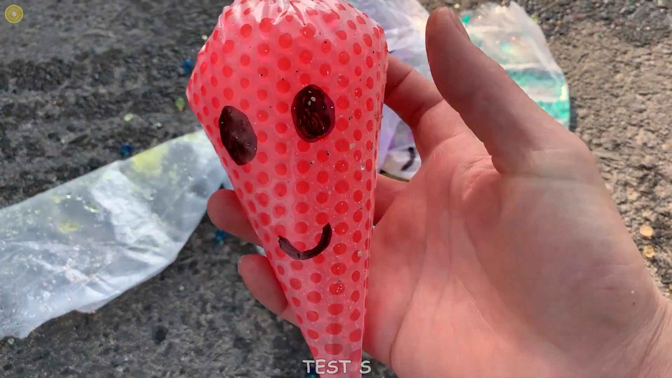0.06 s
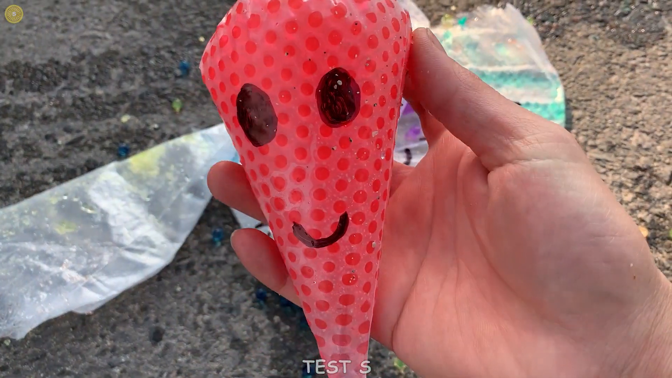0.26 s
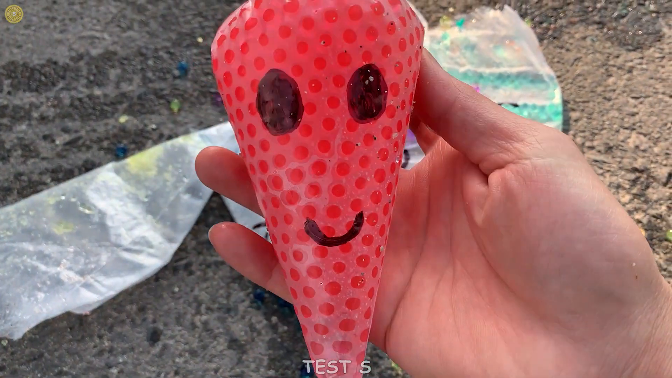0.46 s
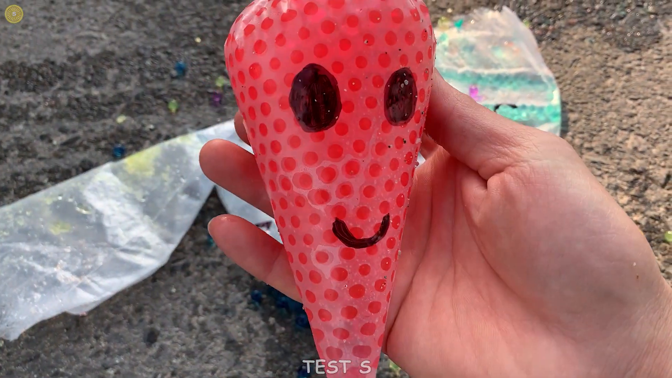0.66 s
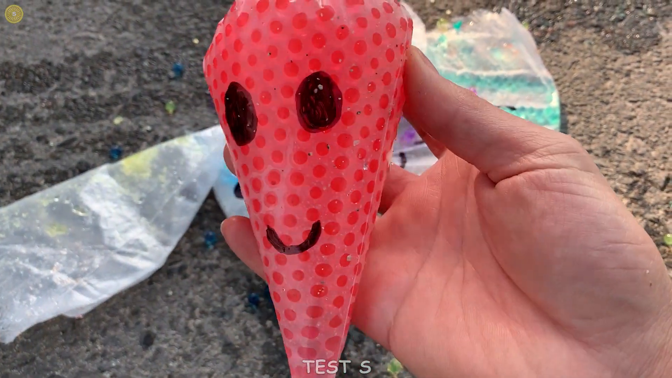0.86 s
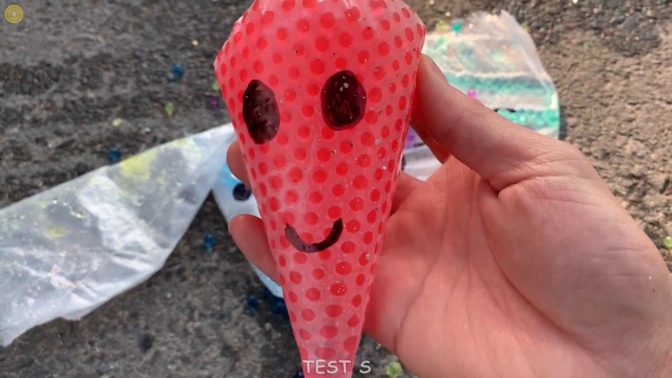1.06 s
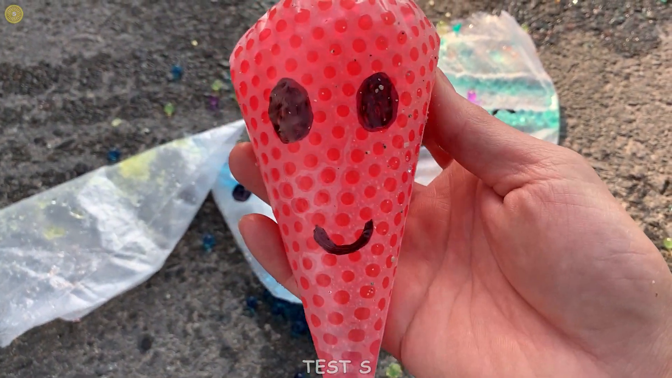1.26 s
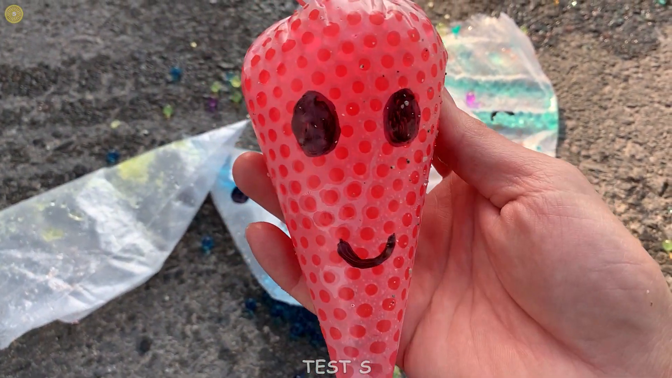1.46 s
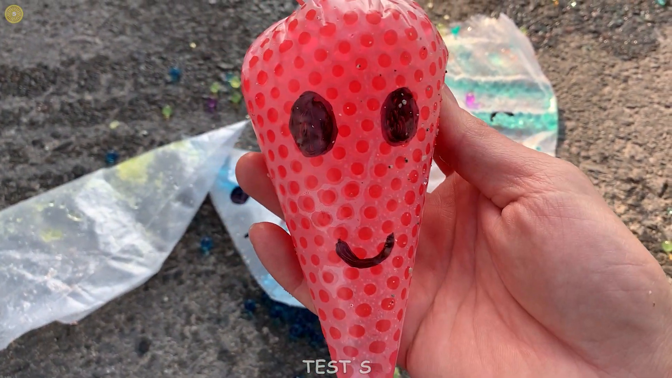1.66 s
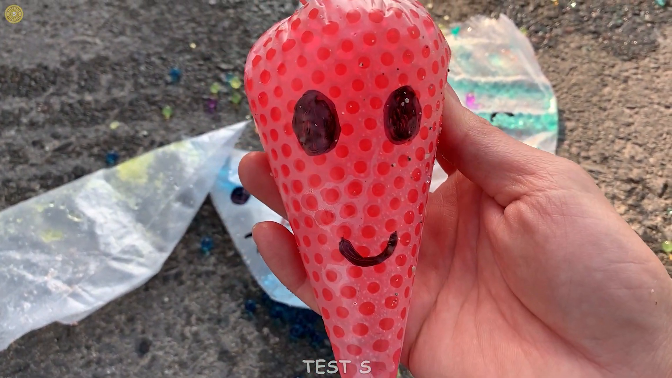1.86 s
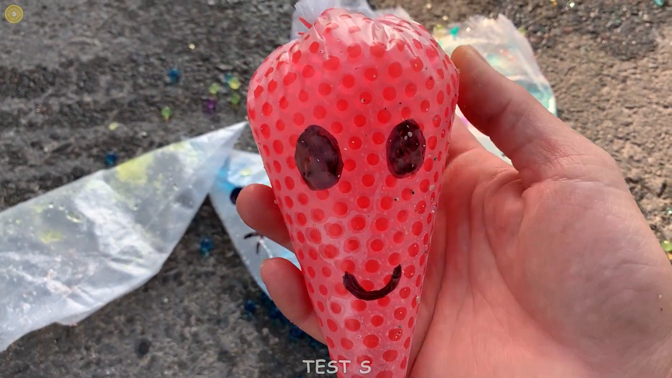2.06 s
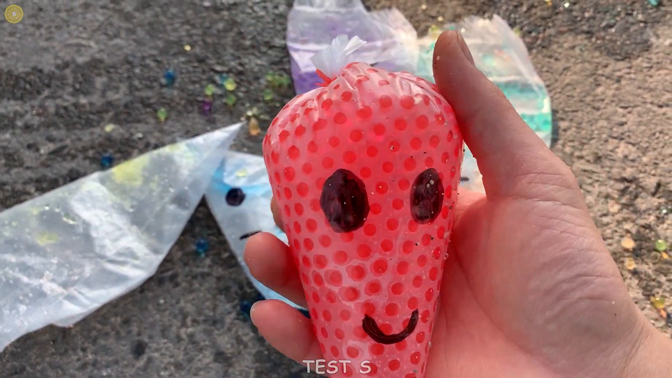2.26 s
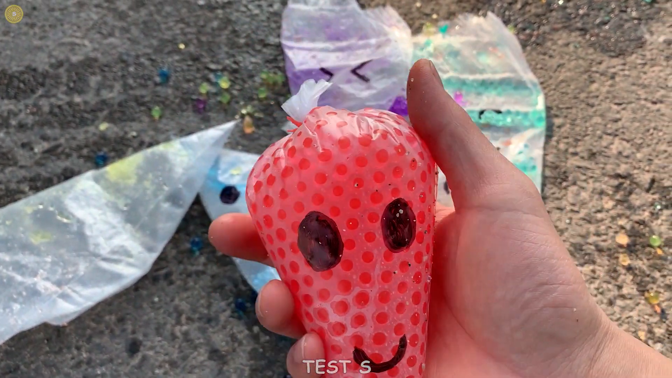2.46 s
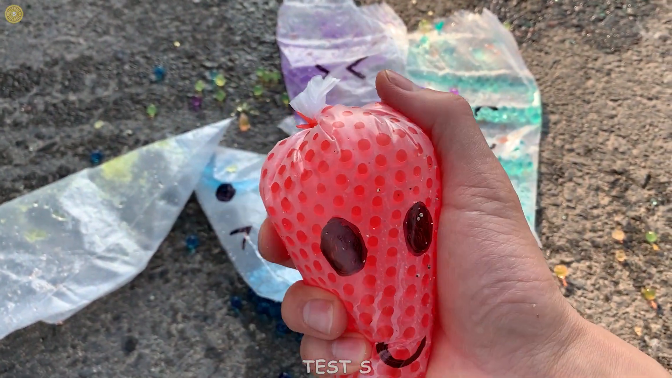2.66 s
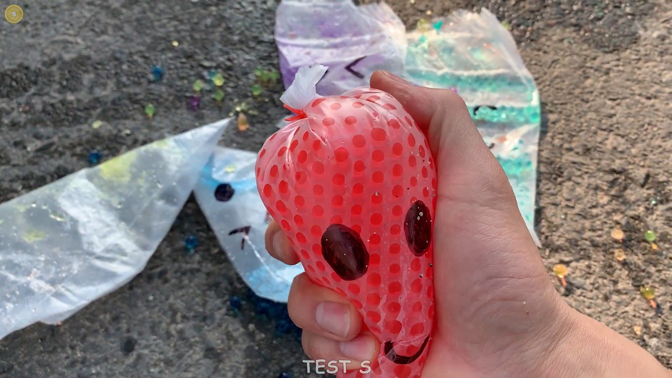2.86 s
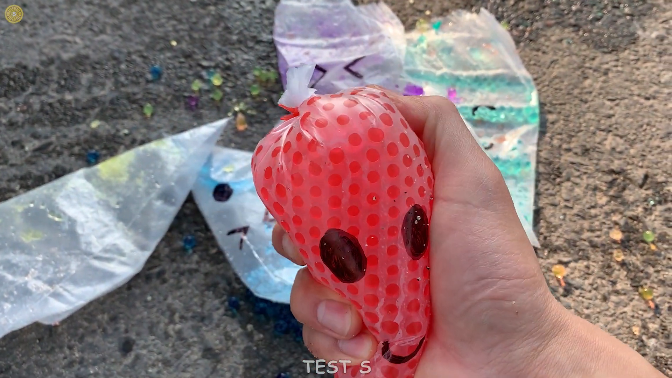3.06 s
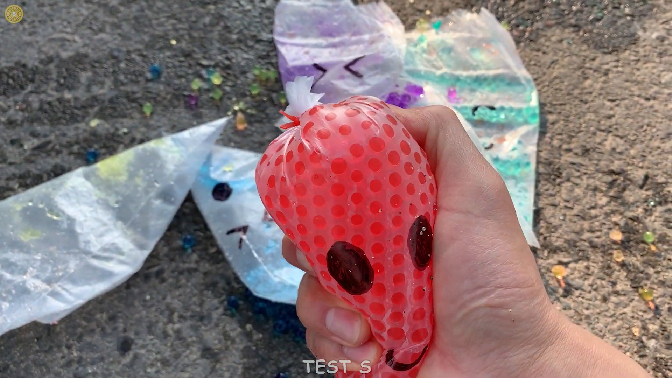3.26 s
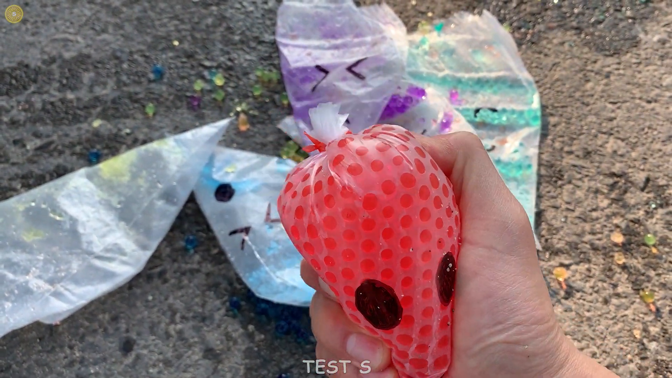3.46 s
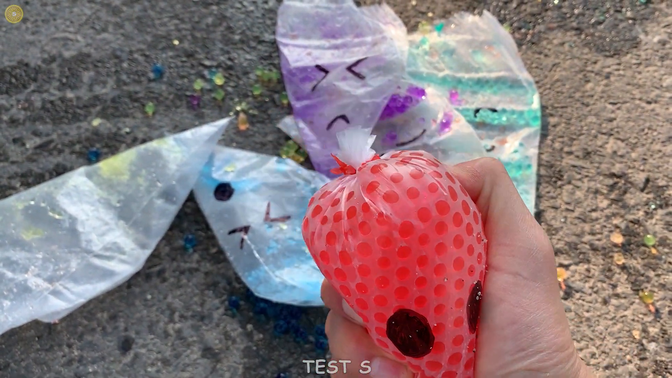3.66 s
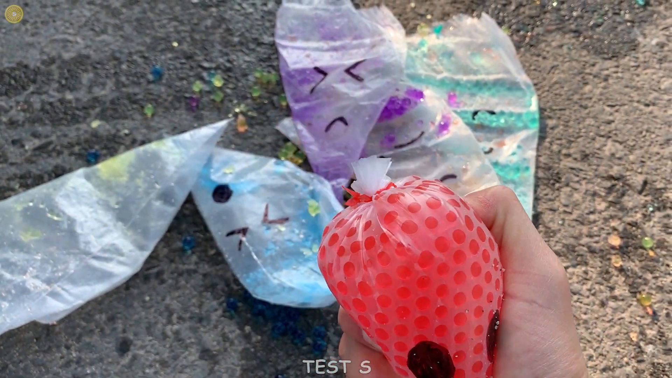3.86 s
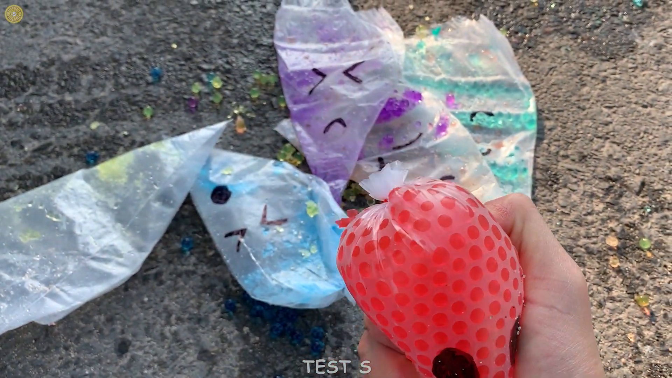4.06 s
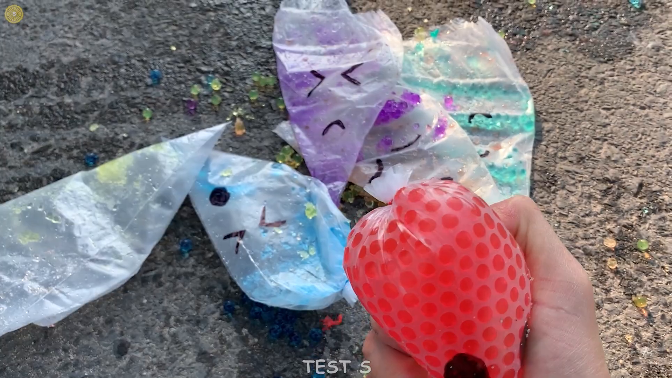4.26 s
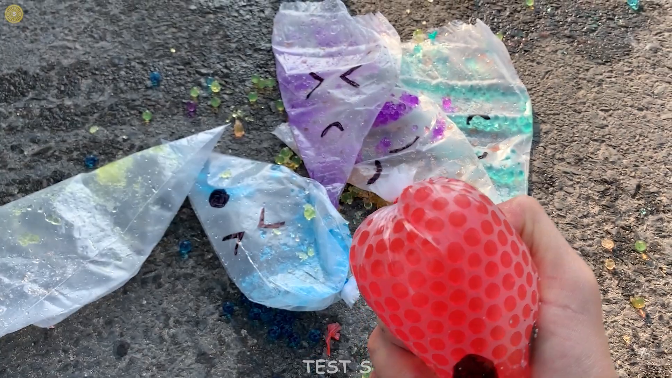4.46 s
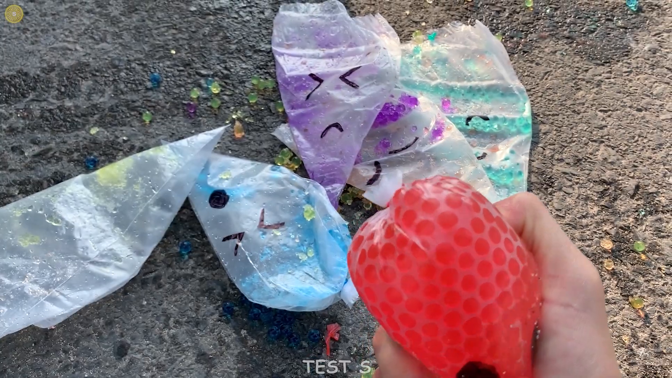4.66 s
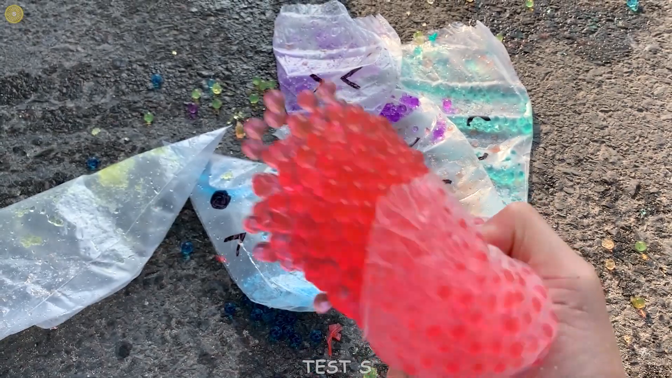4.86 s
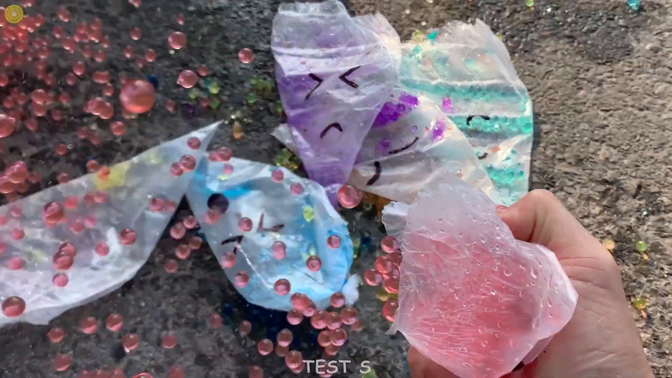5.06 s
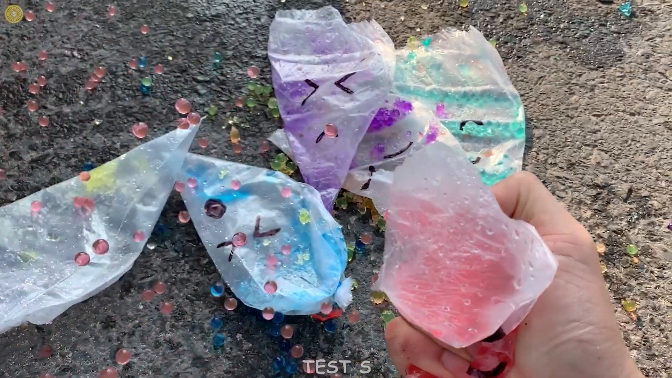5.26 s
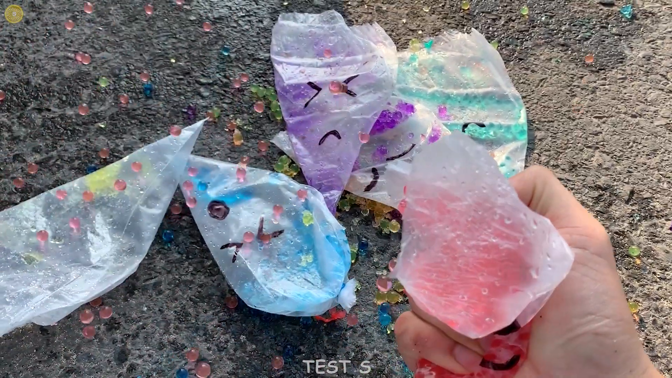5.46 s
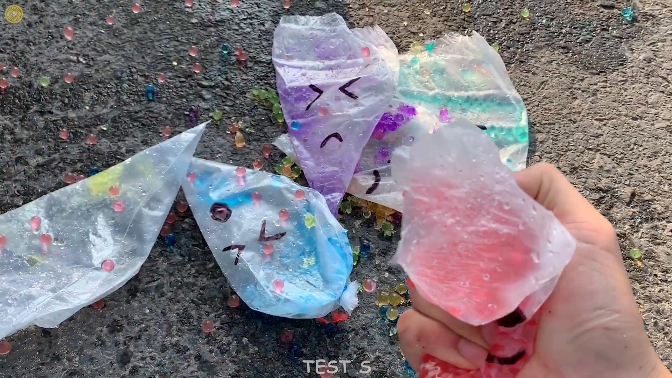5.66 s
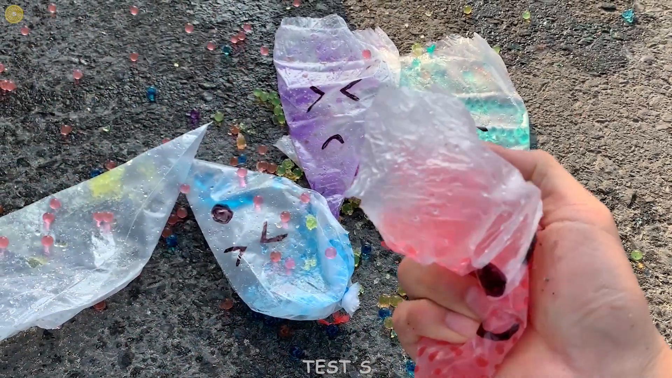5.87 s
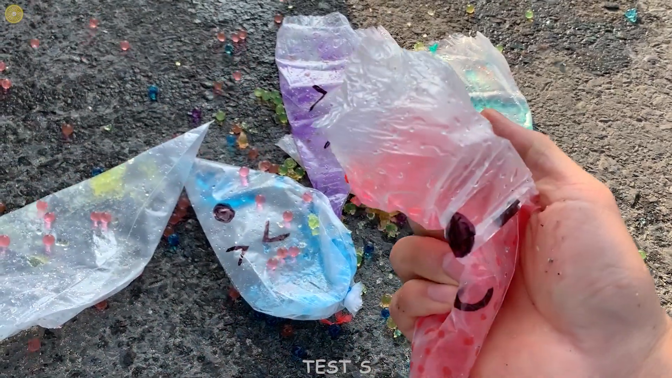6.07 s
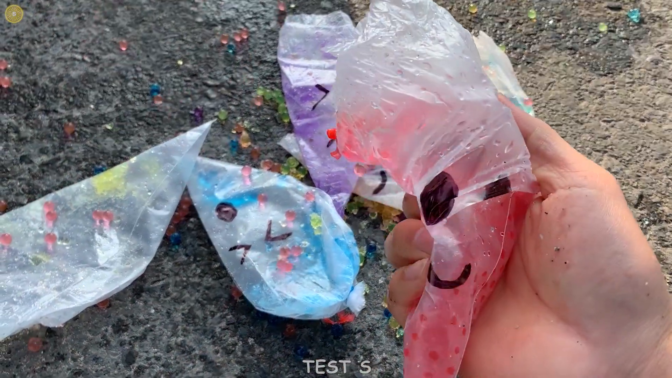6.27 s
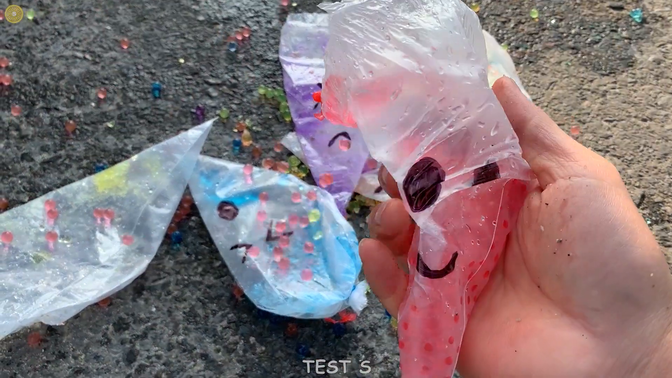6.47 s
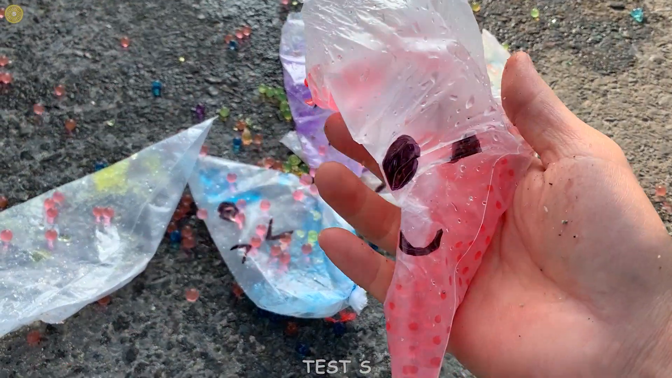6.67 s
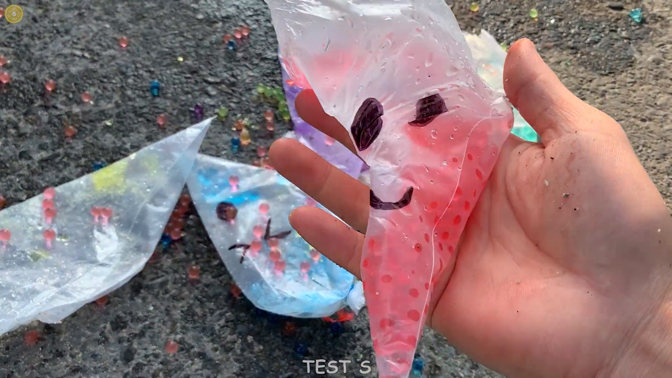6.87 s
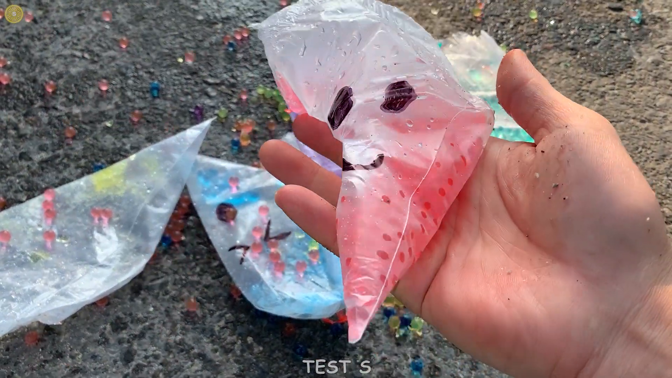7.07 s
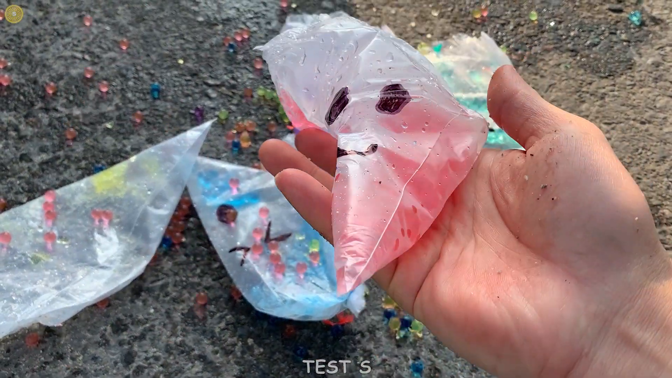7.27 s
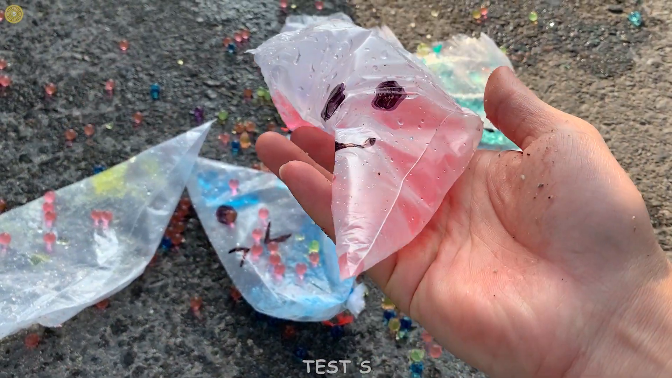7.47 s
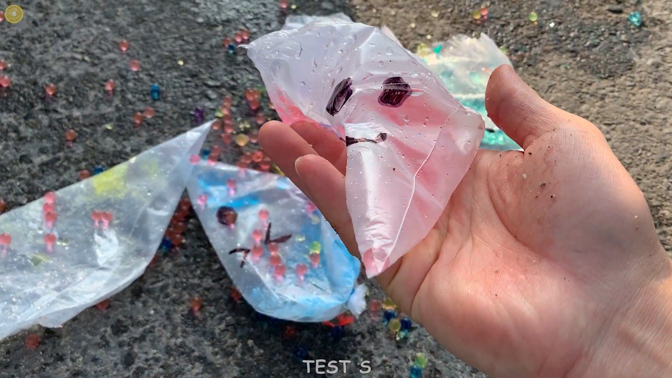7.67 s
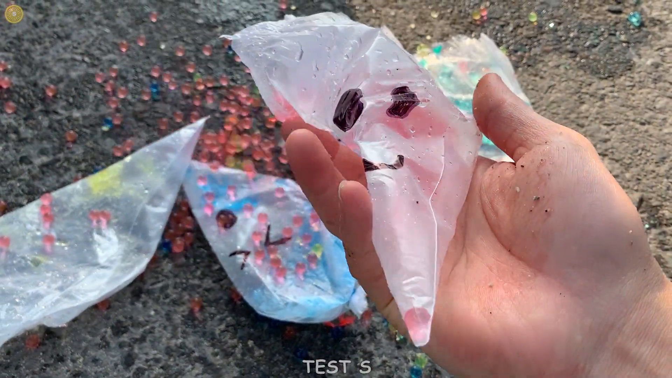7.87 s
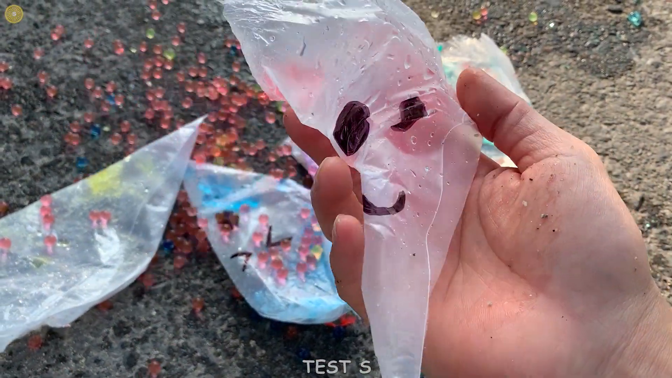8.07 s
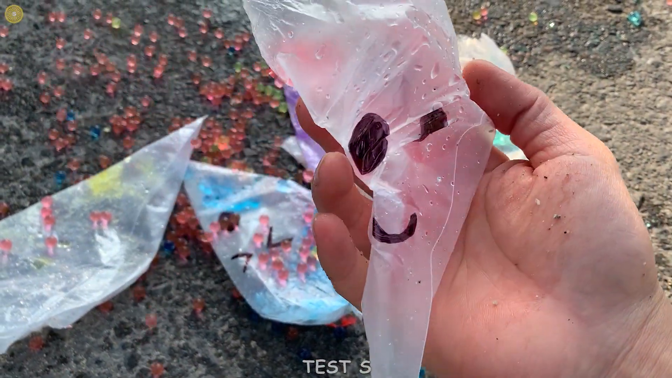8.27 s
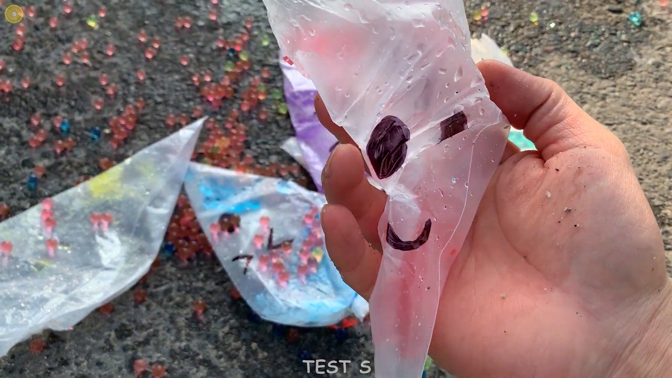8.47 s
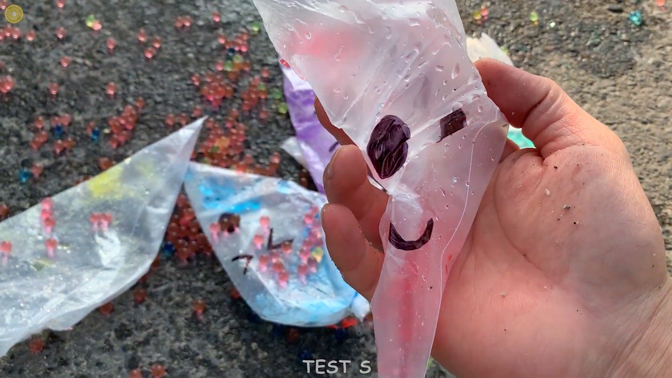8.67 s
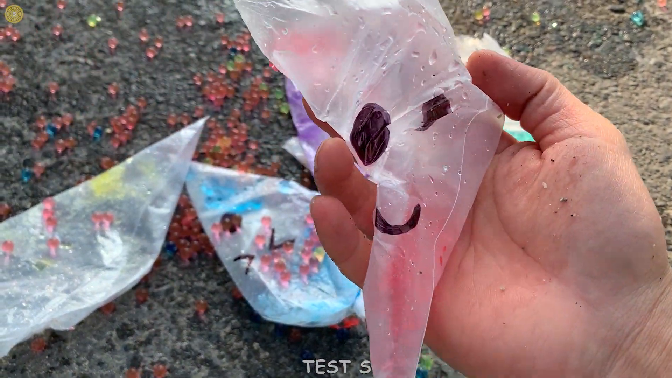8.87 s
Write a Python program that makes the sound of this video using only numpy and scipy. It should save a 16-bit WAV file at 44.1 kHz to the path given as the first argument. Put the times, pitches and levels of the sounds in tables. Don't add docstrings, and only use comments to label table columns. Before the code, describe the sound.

A car idles outdoors throughout, a low throbbing exhaust and motor hum with airy engine noise, plus a soft gust of wind near 0.7 seconds. Close to a phone, a full plastic pouch of gel beads gives a few tiny ticks in the first two seconds. From 2.0 to 3.4 the squeezing brings crisp snaps and small rustles. After a short lull, tighter creaks and sharp snaps come at 3.7 to 4.1, then a thin, high slipping rustle until about 4.5. At 4.9 the film splits with a loud ripping burst, a dull puff and a low flap. Beads patter over asphalt in quick waves until 5.3, amid springy crackles. The torn bag crinkles from 6.0, with a crunchy shake at 6.5. Around 7.5 to 8.1 beads spill in hollow rattles, then a few dull knocks and a last faint rustle near 8.9 over the idle.

```python
import sys
import numpy as np
from scipy import signal
from scipy.fft import rfft, irfft, next_fast_len
from scipy.io import wavfile

SR = 44100
rng = np.random.default_rng(int(sys.argv[2]) if len(sys.argv) > 2 else 0)


def rack_gain(trim_db):
    fader = np.asarray(trim_db, float)
    return 10 ** (fader / 20)


def generate_wav(sig):
    pcm = np.round(np.clip(np.atleast_2d(sig).T, -1, 1) * 32767).astype(np.int16)
    wavfile.write(sys.argv[1], SR, pcm)


N = 393813
PADDED = next_fast_len(N + 4096)
HZ = np.maximum(np.fft.rfftfreq(PADDED, 1 / SR), 1)

GUST_S, GUST_WIDTH_S, GUST_DB, BREEZE_DB = 0.71, 0.33, -44, -53

FIRINGS_PER_S = 23.25
# multiple_of_firing_rate, level_db
EXHAUST_TONES = [(1, -41.5), (2, -40), (3, -44), (4, -59), (5, -60.5), (7, -56.5), (8, -52.5), (9, -62.5)]
# pitch_hz, level_db
MOTOR_TONES = [(57.15, -45), (257.1, -51.5), (314.3, -60.5), (457.2, -56), (514.3, -62), (628.5, -66.5),
               (1350, -59)]
# frequency_hz, level_db (per Hz)
BAY_COLOUR = [(15, -19.5), (32, -23), (45, -10), (64, -4), (270, -18), (451, -22), (734, -31.5),
              (1330, -31), (3520, -37.5), (5880, -50), (7600, -40), (9200, -51), (11600, -67),
              (13200, -57.5), (15500, -99)]
# pitch_hz, width_hz, boost_db
BAY_RINGS = [(590, 38, -1.5), (1340, 20, 9.5), (1717, 115, 5), (2300, 360, -5.5), (2680, 130, 0.5),
             (4400, 990, 8)]
BAY_DB = -40
# frequency_hz, lead_radians
CAR_PHASE = [(0, 0), (1810, 4.9), (2500, 6.3), (3190, 8.7), (4650, 11.7), (5450, 13.6), (5800, 17.8),
             (7300, 21.9), (9400, 18.85), (11650, 15.7), (14100, 12.6), (16500, 9.5)]
# frequency_hz, difference_db
CAR_BALANCE = [(60, -1), (110, 0.5), (200, -4), (380, -1.5), (700, 3.5), (1290, 3.5), (2380, 1),
               (4400, -2.5), (8120, -0.5), (15000, 1)]

# frequency_hz, lead_radians
BAG_PHASE = [(0, 0), (520, 1.2), (1380, 1.0), (2580, 1.3), (3300, 1.4), (4220, 1.0), (5500, 1.5),
             (7100, 3.1), (9400, 0), (11650, -3.14), (14100, -6.3), (16500, -9.4)]
# frequency_hz, level_db (per Hz)
RUSTLE_COLOUR = [(2000, -25), (5000, -34), (6800, -17.5), (7500, -9.5), (8800, -8.5), (10600, -12),
                 (12000, -18.5), (14000, -19.5), (15300, -24.5), (16400, -54)]
# frequency_hz, level_db (per Hz)
PATTER_COLOUR = [(59, -35), (100, -36), (645, 8.5), (793, -4), (1270, 7), (1720, 2), (2070, 7.5), (2910, 8),
                 (4010, 9), (7050, 4), (9000, 3), (11700, -42), (19800, -120)]
# frequency_hz, level_db (per Hz)
SNAP_COLOUR = [(700, -7.5), (2500, -23.5), (4300, -11), (6500, 1), (8000, 6), (11000, -0.5), (13500, -5),
               (15800, -18.5), (16700, -104)]
BEAD_HZ = np.geomspace(700, 6500, 9)

# start_s, hold_s, rustle_db, patter_db, grains_per_s
SLOW_GESTURES = [(2.087, 0.088, -50.5, -61.5, 1600), (2.463, 0.26, -58, -65, 500),
                 (2.927, 0.12, -63.5, -67, 410), (3.22, 0.067, -64, -70, 340), (3.98, 0.1, -56, -69, 680),
                 (4.593, 0.32, -57, -84, 1000), (5.42, 0.035, -55, -51, 990),
                 (5.683, 0.36, -59.5, -59.5, 470), (5.976, 0.53, -61, -58, 450),
                 (6.662, 0.15, -58.5, -61, 340), (6.91, 0.66, -69.5, -64, 160),
                 (7.494, .05, -55.5, -56.5, 1300), (7.6, 0.057, -54, -48.5, 1800),
                 (7.735, 0.094, -48, -47, 1400), (7.927, 0.14, -54, -57, 600),
                 (8.292, 0.18, -87, -63.5, 120), (8.92, 0.057, -51, -58.5, 160)]
QUICK_GESTURES = [
    (4.1, .27, -43.5, -84, 6850),
    (4.37, 0.053, -43.5, -74, 7000),
    (4.43, 0.076, -55.5, -70, 6000),
    (4.96, 0.069, -48, -47, 3170),
    (5.024, 0.039, -34, -38, 4070),
    (5.054, 0.037, -34.5, -36, 3900),
    (5.131, 0.093, -41.5, -40, 3950),
    (5.26, 0.066, -48.5, -47.5, 680),
    (6.46, 0.085, -41.5, -47, 3500),
    (6.57, 0.054, -49, -52, 2500),
]
RIP_GESTURES = [
    (4.88, .006, -17, -29.5, 8100),
    (4.887, 0.014, -13.5, -30, 8120),
    (4.895, 0.018, -30, -20, 7920),
]
SLOW_RISE_DB_PER_S, SLOW_FALL_DB_PER_S = 286, 69
QUICK_RISE_DB_PER_S, QUICK_FALL_DB_PER_S = 898, 502
RIP_RISE_DB_PER_S, RIP_FALL_DB_PER_S = 1502, 417.5

# start_s, peak_db, body_db,
# body_hz
FILM_SNAPS = [(0.4968, -38, -52, 2750), (0.7388, -23.5, -42, 2160), (0.8979, -37, -54, 1830),
              (1.2276, -39, -53, 2100), (2.0243, -34, -53, 1940), (2.152, -14, -18.5, 2410),
              (2.2972, -24, -43, 2720), (2.3633, -33, -35, 2130), (2.4543, -24.5, -36, 2630),
              (2.4713, -25, -51, 2470), (2.5102, -17.5, -32, 2220), (2.519, -23, -53, 1880),
              (2.5526, -25, -52, 1860), (2.5755, -31, -30, 2600), (2.5928, -35, -31, 2350),
              (2.6465, -27, -51, 4760), (2.6763, -23, -42, 2530), (2.696, -22.5, -41, 3470),
              (2.7307, -21, -56, 4670), (2.8062, -18, -54, 2010), (2.9457, -21, -55, 1870),
              (2.9941, -18, -49, 4410), (3.0834, -22, -49, 4670), (3.1014, -30, -49, 1880),
              (3.2208, -15, -53, 4900), (3.2262, -18.5, -36, 3970), (3.2344, -17, -43, 4260),
              (3.3494, -23, -55, 2050), (3.3926, -22.5, -42, 1960),
              (3.7, -25.5, -32, 1940), (3.7576, -20.5, -35.5, 4700), (3.8462, -36, -52, 1820),
              (3.954, -37, -48, 2030), (3.9793, -9, -24.5, 4760), (4.008, -27, -63, 4390),
              (4.04, -34, -56, 1810), (4.066, -27, -44, 4980), (4.0737, -15.5, -41.5, 4480),
              (4.081, -23, -57, 2550), (4.592, -31, -61, 1810), (4.6009, -26, -60, 1930),
              (4.642, -29, -55, 2560), (4.675, -31.5, -56, 1940), (4.7715, -24.5, -58, 1880),
              (4.7952, -28, -58.5, 4660), (4.8192, -31, -43, 4220),
              (4.9522, -15, -30, 2430), (4.974, -34, -35, 2450), (4.9927, -27, -46, 2380),
                (5.0982, -13, -50.5, 3420), (5.13, -15.5, -34, 4900), (5.153, -13, -37.5, 2480),
                (5.204, -23, -42.5, 4270), (5.224, -21, -34.5, 5020), (5.2517, -21, -40, 4860),
                (5.3055, -18, -26.5, 3820), (5.416, -20, -31.5, 5150), (5.422, -15.5, -37, 4730),
                (5.441, -22, -37, 4900), (5.5212, -17.5, -37.5, 2400), (5.588, -33, -43, 5200),
                (5.6053, -25, -39, 2380), (5.616, -30, -36.5, 3450), (5.685, -28, -38, 1970),
                (5.7061, -22.5, -40.5, 3570), (5.735, -31.5, -44, 2700), (5.779, -27.5, -34.5, 2500),
                (5.821, -27, -39.5, 4630), (5.868, -34, -54, 2000),
              (6.015, -20, -34, 2920), (6.034, -24, -25, 2700), (6.048, -18, -50, 2470),
              (6.0521, -33, -26, 2770), (6.08, -23, -40, 2090), (6.0925, -34, -45, 2600),
              (6.1624, -19, -23.5, 2300), (6.203, -35, -33, 1330), (6.251, -28, -36, 2220),
              (6.2796, -22, -32, 2320), (6.29, -25, -30, 1990), (6.3106, -31, -58, 2350),
              (6.3375, -29, -47, 2270), (6.365, -27.5, -46, 2040), (6.402, -26, -35, 1340),
              (6.4587, -17, -25.5, 2530), (6.613, -25, -34.5, 2500), (6.672, -18.5, -27, 1410),
              (6.755, -30, -40, 1340), (6.7833, -29, -46, 3520), (6.795, -13.5, -30, 4630),
              (6.9488, -26, -35, 1400), (6.996, -39, -35, 1340), (7.062, -30, -42, 2130),
              (7.1252, -31, -49, 4360), (7.242, -21, -40, 1400),
              (7.3546, -42, -40, 2120), (7.416, -31, -38.5, 2360), (7.556, -43, -63, 4270),
              (7.568, -33, -63, 3010), (7.604, -27, -41, 1750), (7.6121, -28, -36, 2940),
              (7.647, -30, -43, 2460), (7.674, -23, -38, 2270), (7.705, -33, -48, 2450),
              (7.7448, -19.5, -35.5, 2390), (7.801, -22, -45, 2450), (7.8348, -16.5, -48, 2270),
              (7.905, -30, -37, 2300), (7.937, -29, -39, 2090), (7.9604, -18, -42, 3840),
              (7.9689, -25, -34, 2160), (8.0162, -19, -34, 3320), (8.0768, -31, -54.5, 3250),
              (8.091, -31, -37.5, 2300), (8.175, -34, -53, 2090), (8.1947, -39, -38.5, 1450),
              (8.2242, -33, -33, 2400), (8.298, -42, -42.5, 2360), (8.32, -48, -48, 4760),
              (8.3374, -40, -50, 3050), (8.3982, -25, -33.5, 2170), (8.5718, -42, -44, 4160)]
# start_s, peak_db, body_hz
BEAD_DROPS = [(5.29, -37, 3240), (5.4844, -36, 3730), (5.978, -23, 2220), (6.582, -17, 3020),
              (7.276, -24, 2200), (7.4985, -34, 2860), (7.9857, -21, 3120), (8.149, -21, 1770),
              (8.3643, -21, 1330), (8.4707, -36, 2420), (8.528, -19.5, 1620)]
DROP_TICK_DB, DROP_BODY_DB = -49, -12.5
# start_s, peak_db, body_db, body_hz
BEAD_CRUNCHES = [(5.011, -33, -28, 2400), (5.0214, -29, -31.5, 1560), (5.033, -31, -40, 3240),
                 (5.05, -16, -32, 2450), (5.062, -25, -34, 3440), (5.0738, -15, -32, 4510),
                 (5.091, -17.5, -48.5, 4330), (5.136, -16, -40.5, 4180), (5.164, -13, -29, 4120),
                 (5.1807, -26, -34, 4400), (5.195, -15, -43, 4440), (5.2694, -30, -43, 1970),
                 (5.28, -39, -48, 3390), (5.8805, -31, -45, 4570), (5.9193, -56, -48.5, 1340),
                 (6.058, -37, -39, 2270), (6.0867, -32, -33.5, 2300), (6.134, -40, -50, 2220),
                  (6.157, -30, -36, 2200), (6.4463, -33, -40, 2140), (6.468, -20, -29, 2380),
                  (6.475, -20, -38, 1620), (6.4874, -16, -30, 2050), (6.493, -12, -29.5, 1710),
                  (6.502, -11, -29, 1500), (6.5077, -14, -32, 2060), (6.52, -32, -34, 2180),
                  (6.530, -41, -39, 2400), (6.537, -16, -41, 4200), (6.5432, -15, -35, 2090),
                  (6.5505, -18, -41, 5360), (6.563, -23, -51, 5000), (6.5912, -20, -55, 1240),
                  (6.6086, -36, -35, 1470), (6.634, -28, -41, 3700), (6.6765, -23, -31, 2470),
                 (7.5173, -31, -43, 1310), (7.541, -30, -38, 2520), (7.5694, -18, -37.5, 3070),
                  (7.642, -31, -52, 2430), (7.664, -22, -36, 1390), (7.7124, -24, -31, 1410),
                  (7.7186, -41, -34, 1390), (7.7328, -23, -39, 2400), (7.7598, -39, -39, 1500),
                  (7.7892, -22, -35, 3330), (7.7934, -20, -44, 2420), (7.809, -15, -40.5, 1560),
                  (7.848, -25, -42, 1320), (7.86, -22, -40, 1360), (7.894, -40, -43, 1350),
                  (8.029, -29, -50, 1670), (8.054, -51, -47, 1430), (8.103, -44, -34, 2370)]
CREEP_CREASES = [(2.115, -40, -57, 2500), (2.21, -35.5, -62, 2500), (2.79, -39, -66, 4000),
                 (2.926, -38, -64, 4000), (3.474, -45, -66, 4000), (3.684, -46, -66, 4000),
                 (3.72, -40, -64, 4000), (4.001, -40, -64, 4000), (4.828, -32, -64, 4000),
                 (7.163, -34, -66, 3000), (2.0467, -43, -66, 3000), (2.123, -34, -41, 2500),
                 (2.2702, -46, -66, 3000), (2.4234, -53, -66, 3000), (2.4942, -44, -64, 3000),
                 (2.8369, -48, -66, 3000), (2.9776, -42, -64, 3000), (3.0714, -51, -66, 3000),
                 (3.2889, -48, -66, 3000), (5.55, -32, -39, 2100), (5.7, -28, -40, 3000),
                 (5.7245, -34, -40, 2500), (5.797, -36, -47, 2000), (5.475, -42, -42, 1500)]
CRUNCH_S, CRUNCH_TICK_DB, CRUNCH_BODY_DB = 0.0016, -1, 11.5
SPLIT_S = 4.9
TICK_DELAY_S, TICK_GAIN_DB, BODY_GAIN_DB = 0.0015, 7, 2
BODY_DB_PER_OCTAVE = 3.5
TAIL_DB, TAIL_S = -28.5, 0.005
TAUT_SLAP_DB, TAUT_CYCLES = 11, 1.7
SLACK_SLAP_DB, SLACK_CYCLES = 12, 1.6

FLYING_S, THINNED_SHARE = (4.98, 5.7), 0.29
EMPTYING_S, POUCH_HZ, POUCH_DB = (7.48, 20), 1410, 3
# start_s, length_s, level_db, pocket_hz
POCKET_RATTLES = [(5.027, 0.027, -52, 4800), (5.055, 0.016, -46, 3500), (5.063, 0.017, -43.5, 4800),
                  (5.079, 0.035, -42, 5250), (5.126, 0.015, -50, 4500), (5.148, 0.0093, -50, 5000),
                  (5.167, 0.012, -53, 4300), (5.189, 0.015, -45.5, 4400), (5.224, 0.009, -47, 4970),
                  (5.287, 0.011, -61, 2600), (6.025, 0.027, -49, 3020), (6.153, 0.012, -55, 2930),
                  (7.5, 0.049, -50, 2930), (7.516, .02, -56.5, 1300), (7.608, 0.02, -54.5, 1360),
                  (7.641, .012, -59, 1370), (7.71, 0.021, -50.5, 1420), (7.728, 0.028, -50, 2420),
                  (7.738, 0.013, -50, 5760), (7.776, 0.012, -56, 1550), (7.794, 0.019, -49.5, 2530),
                  (7.846, .035, -50.5, 1410), (7.9, 0.019, -62, 1450), (7.96, 0.025, -54, 1440),
                  (8.018, 0.013, -60, 1760), (8.1, 0.011, -67, 2330), (8.175, 0.012, -59, 1650),
                  (8.344, 0.0039, -61, 1360), (8.44, 0.0086, -63, 1810)]
POCKET_CYCLES = 2.15


def rms_one(x):
    return x / np.sqrt(np.mean(x ** 2) + 1e-20)


def band(x, low_hz, high_hz, order=2):
    return signal.sosfilt(signal.butter(order, [low_hz, high_hz], "band", fs=SR, output="sos"), x)


def drift(rate_hz):
    r = np.exp(-80 * np.pi * rate_hz / SR)
    slow = signal.lfilter([1], [1, -2 * r, r * r], rng.standard_normal(N // 40 + 2002))[2000:]
    return np.interp(np.arange(N) / 40, np.arange(len(slow)), rms_one(slow))


def colour(x, spectrum, rings=()):
    hz, db = np.transpose(spectrum)
    db = np.interp(np.log(HZ), np.log(hz), db)
    for ring_hz, width_hz, boost_db in rings:
        db = db + boost_db / (1 + (2 * (HZ - ring_hz) / width_hz) ** 2)
    cepstrum = irfft(db * np.log(10) / 20, PADDED)
    cepstrum[1:PADDED // 2] *= 2
    cepstrum[PADDED // 2 + 1:] = 0
    response = np.exp(rfft(cepstrum))
    response = response / np.sqrt(np.mean(abs(response) ** 2))
    return irfft(rfft(x, PADDED) * response, PADDED)[..., :N]


def ports(x, phase, balance=((1, 0), (2, 0))):
    half_phase = .5j * np.interp(HZ, *np.transpose(phase))
    half_level = np.log(10) / 40 * np.interp(HZ, *np.transpose(balance))
    half = half_phase + half_level
    return irfft(rfft(x, PADDED) * np.exp([half, -half]), PADDED)[:, :N]


def wind():
    gust = rack_gain(GUST_DB) * np.exp(-((np.arange(N) / SR - GUST_S) / GUST_WIDTH_S) ** 2)
    shared, *own = band(rng.standard_normal((3, N)), 55, 130)
    return gust * rms_one(shared) + rack_gain(BREEZE_DB) * rms_one(np.array(own))


def engine():
    t = np.arange(N) / SR
    turns = FIRINGS_PER_S * t
    tones = np.zeros(N)
    for multiple, db in EXHAUST_TONES:
        level = rack_gain(db + 5.0 + 1.16 * drift(0.97))
        wobble = 0.12 * multiple * drift(0.7)
        tones += level * np.sin(2 * np.pi * (multiple * turns + rng.random()) + wobble)
    for hz, db in MOTOR_TONES:
        level = rack_gain(db + 4.5 + 2.4 * drift(5.1))
        wobble = 0.0011 * hz * drift(4.0)
        tones += level * np.sin(2 * np.pi * (hz * t + rng.random()) + wobble)

    throb_db = 0.46 * np.cos(2 * np.pi * turns) + 0.2 * np.cos(4 * np.pi * turns) + 1.27 * drift(23.0)
    noise = rng.standard_normal((3, N)) * rack_gain(throb_db)
    direct, *scattered = rack_gain(BAY_DB) * colour(noise, BAY_COLOUR, BAY_RINGS)
    scattered = band(scattered, 300, 7000)
    return ports(tones + direct, CAR_PHASE, CAR_BALANCE) + rack_gain(-1.5) * scattered


def thump():
    after = np.maximum(np.arange(N) / SR - 4.885, 0)
    puff = rms_one(band(rng.standard_normal(N), 150, 700))
    puff = rack_gain(-26.0) * puff * after / 0.0054 * np.exp(-after / 0.015)
    late = np.maximum(after - 0.035, 0)
    flap = rack_gain(-17.0) * np.sin(2 * np.pi * 185 * late) * late / 0.015 * np.exp(-late / 0.0097)
    return puff + flap


def gesture(row, rise, fall):
    start, hold, film_db, bead_db, per_s = row
    t = np.arange(0, N, 32) / SR
    loss = rise * np.maximum(start - t, 0) + fall * np.maximum(t - start - hold, 0)
    return [film_db - loss, bead_db - loss, np.full(len(t), max(per_s, 50.))]


def effort():
    moves = [gesture(g, SLOW_RISE_DB_PER_S, SLOW_FALL_DB_PER_S) for g in SLOW_GESTURES]
    moves += [gesture(g, QUICK_RISE_DB_PER_S, QUICK_FALL_DB_PER_S) for g in QUICK_GESTURES]
    moves += [gesture(g, RIP_RISE_DB_PER_S, RIP_FALL_DB_PER_S) for g in RIP_GESTURES]
    film_db, bead_db, per_s = np.transpose(moves, (1, 0, 2))
    leader = np.argmax(np.maximum(film_db, bead_db), axis=0)
    steps = np.arange(len(leader))
    curves = (film_db.max(axis=0), bead_db.max(axis=0), per_s[leader, steps])
    return [np.interp(np.arange(N) / 32, steps, curve) for curve in curves]


def grains(per_s, spread_db, clump_db):
    clumps = rack_gain(clump_db * (500 / per_s) ** 0.5 * drift(30))
    sizes = rack_gain(spread_db * np.minimum(rng.exponential(1, (2, N)), 3.5))
    sizes = sizes * rng.choice([-1, 1], (2, N))
    happens = rng.random((2, N)) < per_s * clumps / SR
    return sizes * happens * np.sqrt(SR / per_s / np.mean(sizes ** 2))


def knocks(clicks, cycles):
    dealt = rng.integers(0, len(BEAD_HZ), N)
    out = 0
    for k, hz in enumerate(BEAD_HZ):
        r = rack_gain(-60 * hz / cycles / SR)
        turn = 2 * np.pi * hz / SR
        strike = np.sqrt(1 - r * r) * np.array([1, 0, -1]) / 2
        out = out + signal.lfilter(strike, [1, -2 * r * np.cos(turn), r * r], clicks * (dealt == k) + 1e-18)
    return out


def surroundings(beads):
    t = np.arange(N) / SR
    flying = (t > FLYING_S[0]) * (t < FLYING_S[1])
    emptying = (t > EMPTYING_S[0]) * (t < EMPTYING_S[1])
    low = signal.sosfilt(signal.butter(1, 2200, fs=SR, output="sos"), beads)
    hollow = band(beads, POUCH_HZ / 0.98, POUCH_HZ * 1.08, order=1)
    return beads - THINNED_SHARE * low * flying + rack_gain(POUCH_DB) * hollow * emptying


def handling():
    film_db, bead_db, per_s = effort()
    film = colour(rack_gain(film_db) * grains(per_s, 3.1, 6.7), RUSTLE_COLOUR)
    contacts = rack_gain(bead_db) * grains(per_s, 3.0, 5.0)
    beads = surroundings(colour(contacts + knocks(contacts, cycles=6.7), PATTER_COLOUR))
    rolling = rack_gain(-44.0) * film[1] + rack_gain(1.0) * beads[1]
    flank = rack_gain(-13.0) * np.roll(beads[1], 310)
    ground = np.array([rolling + flank, np.roll(rolling, 5) - flank])
    return film[0] + beads[0] + thump(), ground


def rattles():
    out = np.zeros((2, N + 4999))
    t = np.arange(600) / SR
    chance = rng.standard_normal((len(POCKET_RATTLES), 2501))
    for (start, length, db, hz), draw in zip(POCKET_RATTLES, chance):
        swell = np.sin(np.pi * np.minimum(np.arange(2500) / SR / length, 1))
        pocket = np.sin(2 * np.pi * hz * t) * np.exp(-t * hz / POCKET_CYCLES)
        rung = rms_one(np.convolve(draw[:2500] ** 3 * swell, pocket))
        sides = rack_gain(db + 1.1 * draw[-1] * np.array([[1], [-1]]))
        at = int(start * SR)
        out[:, at:at + 3099] += sides * rung * np.sqrt(3099 / SR / length)
    return out[:, :N]


def snap_events():
    creases = FILM_SNAPS
    creases = creases + [(s, db + DROP_TICK_DB, db + DROP_BODY_DB, hz) for s, db, hz in BEAD_DROPS]
    crunches = BEAD_CRUNCHES + CREEP_CREASES
    crunches = [(s, db + CRUNCH_TICK_DB, body + CRUNCH_BODY_DB, hz) for s, db, body, hz in crunches]
    return np.transpose(creases + crunches), len(creases)


def crease_crack(draw, after, cluster_db, spread_s, steep):
    distance = np.where(after < 0, -steep * after, after)
    crack = rack_gain(cluster_db) * draw[:900] ** 3 / 4 * np.exp(-distance / spread_s)
    crack += rack_gain(TAIL_DB) * draw[:900] * (after > 0) * np.exp(-after / TAIL_S)
    crack[150] = np.sign(draw[-2])
    return crack


def crunch_crack(draw, after):
    return rack_gain(-21) * draw[:900] * abs(draw[1:901]) * np.exp(-(after / CRUNCH_S) ** 2)


def snaps():
    (start_s, peak_db, body_db, body_hz), crease_count = snap_events()
    start_s = start_s + TICK_DELAY_S
    peak_db = peak_db + TICK_GAIN_DB
    body_db = body_db + BODY_GAIN_DB - peak_db
    body_db = body_db + BODY_DB_PER_OCTAVE * np.log2(body_hz / 2500)
    ticks, body, slaps = np.zeros((3, 2, N + 1999))
    t = np.arange(900) / SR
    after = t - t[150]
    for k, draw in enumerate(rng.standard_normal((len(start_s), 902))):
        at = int(start_s[k] * SR) - 155
        sides = rack_gain(peak_db[k] + 2.37 * draw[-1] * np.array([[1], [-1]]))
        if start_s[k] < SPLIT_S:
            cluster_db, spread_s, steep, tick_db = -26.0, .0012, 3.5, 3.0
            slap_db, cycles = TAUT_SLAP_DB, TAUT_CYCLES
        else:
            cluster_db, spread_s, steep, tick_db = -7.0, .0014, 1.3, -4.0
            slap_db, cycles = SLACK_SLAP_DB, SLACK_CYCLES
        if k < crease_count:
            crack = crease_crack(draw, after, cluster_db, spread_s, steep)
        else:
            crack = crunch_crack(draw, after)
            tick_db += 6.3
        ring = np.sin(2 * np.pi * body_hz[k] * t[:300]) * np.exp(-t[:300] * body_hz[k] / cycles)
        ticks[:, at:at + 900] += sides * rack_gain(tick_db) * crack
        body[:, at:at + 1199] += sides * rack_gain(body_db[k] - 4.5) * np.convolve(crack, ring)
        slaps[:, at:at + 900] += sides * rack_gain(body_db[k] + slap_db) * crack
    slaps = band(slaps + 1e-18, 1000, 7000)
    return colour(ticks[:, :N], SNAP_COLOUR) + (body + slaps)[:, :N]


def scene():
    handled, rolling = handling()
    bag = ports(handled + rattles() + snaps(), BAG_PHASE) + rolling
    echo = rack_gain(-37.0) * np.pad(bag, ((0, 0), (95, 0)))[:, :N]
    return wind() + engine() + bag + echo


def top_cut(x):
    return signal.sosfilt(signal.butter(12, 16650, fs=SR, output="sos"), x)


def record(dry):
    low_cut = signal.sosfilt(signal.butter(3, 33, "high", fs=SR, output="sos"), dry)
    mix = 0.79 * np.tanh(low_cut / 0.94)
    return top_cut(mix)


dry = scene()
out = record(dry)
generate_wav(out)
```